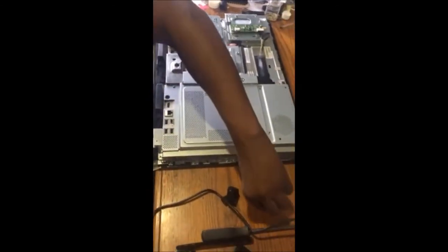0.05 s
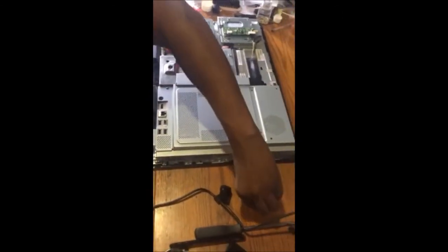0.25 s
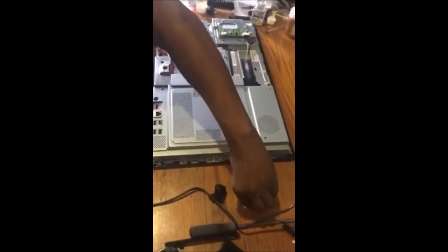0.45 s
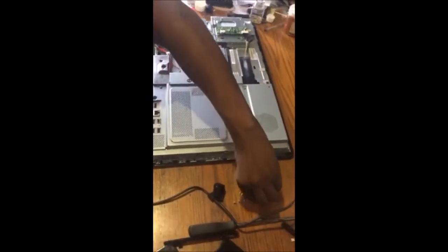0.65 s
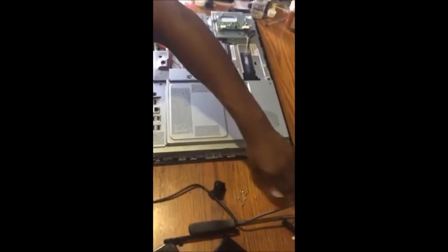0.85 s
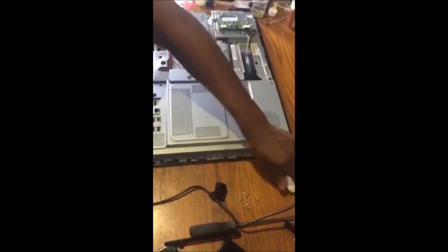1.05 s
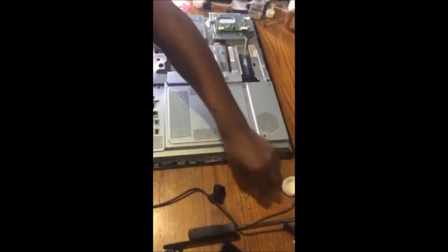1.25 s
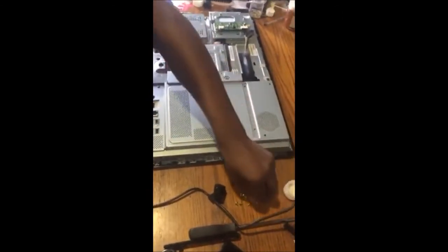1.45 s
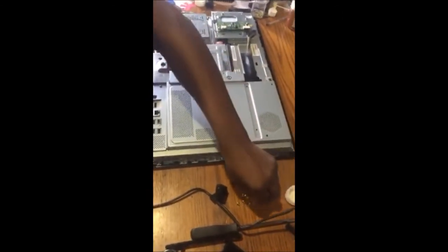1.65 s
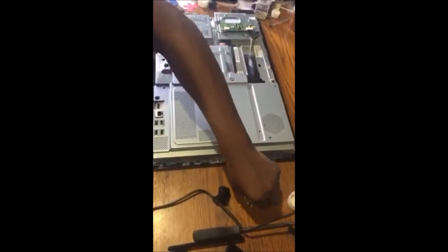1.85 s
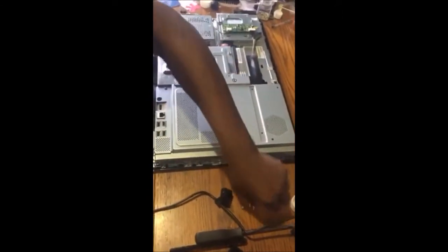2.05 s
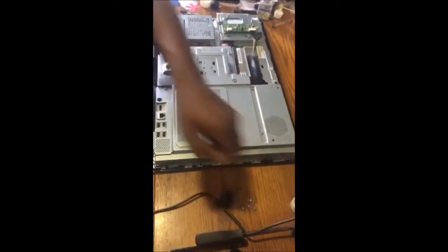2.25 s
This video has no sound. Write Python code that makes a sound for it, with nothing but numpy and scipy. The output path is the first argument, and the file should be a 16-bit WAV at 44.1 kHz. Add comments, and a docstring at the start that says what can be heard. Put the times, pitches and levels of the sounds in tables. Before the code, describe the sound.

A small hard part clatters on a wooden table from about 0.2 seconds, bouncing until it settles at 0.8. A soft bump follows at 0.9. Just after 1 second a plastic cap is set down with a dull clack, then wobbles on its rim from 1.2, growing faster and brighter until it stops at about 2. Behind are faint room hiss, low hum and barely audible distant bird chirps.

```python
"""A wooden table in a small room. A small hard part drops, bounces and chatters to rest.
After a soft bump a plastic cap is set down and wobbles on its rim, faster and faster, until flat.
Each contact is a force pulse that rings the object's modes and the dense response of the wood.
Behind: air noise, a low hum and faint chirps of a distant bird."""
import sys
import numpy as np
from scipy import signal
from scipy.fft import rfft, irfft
from scipy.io import wavfile
from scipy.ndimage import uniform_filter1d

SR = 44100
rng = np.random.default_rng(int(sys.argv[2]) if len(sys.argv) > 2 else 0)


def materialize(psi):
    """Save the field psi as 16-bit PCM at rate SR to the path in sys.argv[1].

    A 1-D psi becomes a single channel; in a 2-D psi each row is a channel.
    """
    bounded = np.clip(np.atleast_2d(psi).T, -1, 1)
    quanta = np.round(bounded * 32767).astype(np.int16)
    wavfile.write(sys.argv[1], SR, quanta)


N = 101429

# modes of the cap on the table: pitch_hz, level_db, t60_s
CAP_MODES = [(1000, -12, .055), (1200, -10, .11), (1351, -15, .12), (1806, -11, .12), (2197, -8, .09),
             (2335, -6, .075), (2470, -10, .06), (2830, -9, .1), (3340, -14, .1), (4500, -15, .04)]


def amp(db):
    """Decibels to gain."""
    return 10 ** (np.asarray(db) / 20)


def unit(x):
    """Scale to unit energy."""
    return x / np.sqrt(np.sum(x ** 2) + 1e-20)


def at_hz(points, hz):
    """Interpolate a table over log frequency."""
    knots_hz, values = np.transpose(points)
    return np.interp(np.log(hz + 1), np.log(knots_hz + 1), values)


def envelope(curve):
    """Gain along a level curve, zero outside it."""
    time_s, level_db = np.transpose(curve)
    return amp(np.interp(np.arange(N) / SR, time_s, level_db, left=-np.inf, right=-np.inf))


def add(mix, start_s, sound):
    """Mix in place, cropped to fit."""
    start = round(start_s * SR)
    sound = sound[max(-start, 0):]
    span = mix[max(start, 0):][:len(sound)]
    span += sound[:len(span)]


def min_phase(db_at, size):
    """Quickest pulse with a given spectrum."""
    log_gain = np.log(amp(db_at(abs(np.fft.fftfreq(size, 1 / SR)))))
    spectrum = np.exp(np.conj(signal.hilbert(log_gain)))
    return np.fft.ifft(spectrum).real[:size // 2]


def contact(tilt_db_oct, corner_hz=3260):
    """Force pulse of one contact: harder means more treble."""
    return min_phase(lambda hz: tilt_db_oct * np.log2(1 + (hz / corner_hz) ** 2) / 2, size=256)


def impacts(rows):
    """Force of a series of single contacts."""
    force = np.zeros(N)
    for start_s, level_db, tilt_db_oct in rows:
        add(force, start_s, amp(level_db) * contact(tilt_db_oct))
    return force


def grains(size, rate_hz, spread_db):
    """Random tiny contacts, on average unit energy per 10 ms."""
    hits = rng.random(size) < rate_hz / SR
    sign = rng.choice([-1, 1], size)
    strength = amp(spread_db * np.clip(rng.standard_normal(size), -2, 2))
    return unit(hits * sign * strength) * np.sqrt(size / SR * 100)


def dense_ring(t, t60_s):
    """Countless close modes dying together, with a flattened spectrum."""
    ring = rng.standard_normal(len(t))
    decay = amp(-60 * t / t60_s)
    undo_decay = amp(60 * np.minimum(t, t60_s) / t60_s) * np.sqrt(t60_s * SR / 13.8)
    for _ in range(3):
        spectrum = rfft(ring * decay)
        flat = irfft(spectrum / np.sqrt(uniform_filter1d(abs(spectrum) ** 2, size=20)), len(t))
        ring = np.where(t < t60_s / 2, unit(flat) * undo_decay, ring)
    return unit(ring * decay)


def body(modes, wood, modes_db, t60_s, treble_t60_s, rise_s, vary_db, crossover_hz=5000):
    """Response to one contact: dense wood ring, shorter in the treble, plus a few strong modes."""
    t = np.arange(SR // 4) / SR
    treble_share = 1 / (1 + (crossover_hz / (np.fft.rfftfreq(len(t), 1 / SR) + 1)) ** 6)
    low = rfft(dense_ring(t, t60_s)) * np.sqrt(1 - treble_share)
    high = rfft(dense_ring(t, treble_t60_s)) * np.sqrt(treble_share)
    rise = 1 - np.exp(-t / rise_s)
    ring = rise * irfft(low + high, len(t)) * (t < t[-1] / 2)
    colour = min_phase(lambda hz: at_hz(wood, hz), size=4096)
    dense = unit(signal.fftconvolve(ring, colour)[:len(t)])
    tones = np.zeros(len(t))
    for k, (pitch_hz, level_db, mode_t60_s) in enumerate(modes):
        pitch_hz += 1.5 * rng.uniform(-0.91, 1) / mode_t60_s  # contact point shifts damped modes most
        mode = (-1) ** k * rise * amp(-60 * t / mode_t60_s) * np.sin(2 * np.pi * pitch_hz * t)
        tones += amp(level_db + vary_db * rng.uniform(-1, 1)) * unit(mode)
    return dense + amp(modes_db) * tones


def turning(force, responses, turns_per_s):
    """As an object turns, the force passes between contact points, each with its own response."""
    out, count = np.zeros(N), len(responses)
    position = np.arange(N) / SR * turns_per_s * count
    for k, response in enumerate(responses):
        share = np.sin(np.pi / 2 * np.minimum((position - k) % count, 2)) ** 2
        out += signal.fftconvolve(share * force, response)[:N]
    return out


def small_part(settle_s=0.812, ring_hz=4340, ring_decay_s=0.014):
    """A hard part tumbles, bounces and chatters, then rings faintly as it settles."""
    # single hits: start_s, level_db, tilt_db_oct
    bounces = [(.2105, -12.5, -0.5), (.2365, -12, 1), (.243, 0, 2), (.2523, 1, -36), (.2625, -9, -12),
               (.2657, -0.5, -1), (.2822, -6, 1.5), (.306, -11.5, 6.5), (.3165, -6.5, 4.5), (.3205, -1, -4),
               (.3315, -4, -1.5), (.341, -3.5, 0.5), (.369, -6.5, 5), (.3773, -3.5, -0.5),
               (.3795, -5.5, 1.5), (.4058, -9.5, -1), (.4248, -5.5, 1.5), (.4615, -14, 2.5),
               (.4775, -19.5, 5), (.4925, -16, -5), (.4995, -13.5, 3), (.5305, -2.5, 1), (.58, -4, 2),
               (.6225, -3.5, 3), (.6335, -6.5, -2), (.6587, -9, 0.5), (.6655, -9, 0.5), (.6942, -6.5, 3),
               (.7282, -7, 3.5), (.754, -15, 6), (.791, -13, 0.5)]
    # fine chatter between hits: time_s, level_db
    chatter_curve = [(.17, -36.5), (.235, -26), (.255, -12), (.30, -19.5), (.335, -7.5), (.357, -17),
                     (.385, -10.5), (.46, -10.5), (.52, -17), (.57, -32), (.64, -23.5), (.78, -15),
                     (.825, -24.5), (.86, -51)]
    # modes of the part on the table: pitch_hz, level_db, t60_s
    modes = [(980, -12, .06), (1070, -15, .08), (1410, -16, .15), (1721, -14, .12), (1951, -9, .08),
             (2220, -5, .035), (2318, -6, .065), (2545, -13, .12), (2855, -11, .09), (3332, -13, .12),
             (3673, -13, .15), (6150, -8, .03)]
    # wood spectrum under the part: freq_hz, level_db
    wood = [(80, -19), (230, -12), (350, -5), (480, -16), (750, -1), (1300, -9), (2300, 5.5), (2900, 0),
            (4800, -1.5), (6200, 0), (8000, -5.5), (11000, -12.5), (15000, -15)]
    chatter = envelope(chatter_curve) * grains(N, rate_hz=700, spread_db=6.5)
    force = impacts(bounces) + np.convolve(chatter, contact(tilt_db_oct=1.5))[:N]
    responses = [body(modes, wood, modes_db=-4.5, t60_s=0.06, treble_t60_s=0.038,
                      rise_s=0.000081, vary_db=3.5) for _ in range(7)]
    out = amp(-8) * turning(force, responses, turns_per_s=5.18)
    t = np.arange(SR // 10) / SR
    add(out, settle_s, amp(-52) * np.exp(-t / ring_decay_s) * np.sin(2 * np.pi * ring_hz * t))
    return out


def cap_wobble(grain_rate_hz=2500, swing_fall_s=0.009):
    """The rim knocks and rolls over the wood grain in ever closer swings."""
    # rim knocks: start_s, level_db, tilt_db_oct
    knocks = [(1.241, 2, -2), (1.273, -2.5, -4), (1.344, -0.5, 0), (1.3535, -0.5, 1.5), (1.442, -7.5, 9),
              (1.4495, -3.5, 0.5), (1.514, -12.5, 3), (1.526, -5, -2), (1.598, -6.5, -5), (1.605, -2, -4),
              (1.679, -1, 1), (1.686, -5, 0), (1.745, -5, 1), (1.754, -2, 2), (1.8135, -3.5, 3.5),
              (1.821, -2.5, 2), (1.873, 0.5, -8.5), (1.88, -2.5, 6), (1.925, -1.5, 8), (1.969, -1.5, -17),
              (2.003, -2, 4.5)]
    # rolling swells: peak_s, rise_s, level_db
    swings = [(1.229, 0.0076, -10), (1.254, 0.006, 2), (1.357, 0.023, -4.5), (1.449, 0.022, -3.5),
              (1.538, 0.026, -4.5), (1.614, 0.021, -5), (1.691, 0.01, -3), (1.76, 0.011, -7),
              (1.885, 0.016, -4), (1.933, 0.0083, -3.5), (1.977, 0.016, -4.5)]
    # swings brighten as the cap sinks: time_s, tilt_db_oct
    swing_tilt = [(1.7, -2), (1.9, 6)]
    # slow rolling between swings: time_s, level_db
    creep_curve = [(1.06, -5.5), (1.2, -31), (1.3, -23), (1.6, -17), (1.9, -14.5), (2.025, -16),
                   (2.045, -47)]
    # wood spectrum under the cap: freq_hz, level_db
    wood = [(80, -22), (220, -14), (340, -1), (550, -9), (850, -2), (1550, -1.5), (2300, 7), (3200, -2.5),
            (4400, -5.5), (5200, -15), (6400, -15), (7600, -25.5), (15000, -47)]
    creep = envelope(creep_curve) * grains(N, grain_rate_hz, spread_db=1)
    force = impacts(knocks) + np.convolve(creep, contact(tilt_db_oct=-19.5))[:N]
    t = np.arange(-SR // 20, SR // 10) / SR
    for peak_s, rise_s, level_db in swings:
        pulse = contact(np.interp(peak_s, *np.transpose(swing_tilt)))
        swell = np.where(t < 0, np.exp(-(t / rise_s) ** 2), np.exp(-abs(t) / swing_fall_s))
        roll = swell * grains(len(t), grain_rate_hz, spread_db=1)
        add(force, peak_s + t[0], amp(level_db) * np.convolve(roll, pulse))
    responses = [body(CAP_MODES, wood, modes_db=-5, t60_s=0.041, treble_t60_s=0.028,
                      rise_s=0.0014, vary_db=5) for _ in range(6)]
    return amp(-13) * turning(force, responses, turns_per_s=2.3)


def rim_snaps(band_hz=(5400, 6900)):
    """The rim's hard edge snaps brightly on the wood."""
    # edge hits: start_s, level_db
    snaps = [(1.744, -26), (1.8123, -22)]
    out, t = np.zeros(N), np.arange(SR // 10) / SR
    band = signal.butter(5, band_hz, "bandpass", fs=SR, output="sos")
    for start_s, level_db in snaps:
        add(out, start_s, amp(level_db) * unit(signal.sosfilt(band, dense_ring(t, t60_s=0.03))))
    return out


def cap_landing(start_s=1.0558):
    """The cap is set down with one dull clack."""
    # wood spectrum of the clack: freq_hz, level_db
    wood = [(150, -17), (600, -13), (1200, 0), (1700, -6.5), (2400, 4.5), (3000, -14), (4300, -21),
            (5300, -44), (11600, -35), (14000, -47)]
    out = np.zeros(N)
    clack = body(CAP_MODES, wood, modes_db=-10, t60_s=0.03, treble_t60_s=0.02, rise_s=0.003, vary_db=0)
    add(out, start_s, amp(-7) * clack)
    return out


def table_bumps(sag_depth=2.87, sag_s=0.0021, rise_s=0.0017):
    """Soft pushes on the table, a few cycles each, whose pitch sags at once."""
    # pushes: start_s, level_db, final_pitch_hz, decay_s
    bumps = [(0.579, -44.5, 225, 0.013), (0.9352, -24.5, 113.4, 0.0033), (1.779, -54.5, 85, 0.03)]
    out, t = np.zeros(N), np.arange(SR // 10) / SR
    for start_s, level_db, pitch_hz, decay_s in bumps:
        cycles = np.cumsum(pitch_hz * (1 + sag_depth * np.exp(-t / sag_s))) / SR
        shape = (1 - np.exp(-t / rise_s)) * np.exp(-t / decay_s)
        add(out, start_s, amp(level_db) * shape * np.sin(2 * np.pi * cycles))
    return out


def finger_scuff(peak_s=1.176, half_width_s=0.022, centre_hz=1000):
    """Skin rubs plastic as the fingers let go: noise an octave wide."""
    band_hz = [centre_hz / np.sqrt(2), centre_hz * np.sqrt(2)]
    band = signal.butter(2, band_hz, "bandpass", fs=SR, output="sos")
    rub = unit(signal.sosfilt(band, rng.standard_normal(N))) * np.sqrt(N)
    swell = np.exp(-((np.arange(N) / SR - peak_s) / half_width_s) ** 2)
    return amp(-58) * swell * rub


def bird():
    """Distant wavering peeps, most arching up and down in pitch."""
    # peeps: middle_s, length_s, top_hz, level_db, arch_fraction
    chirps = [(.003, .032, 5000, -56, .2), (.085, .024, 4000, -57, .17), (1.53, .022, 5400, -51, .17),
              (1.913, .024, 5350, -52, .17), (2.166, .046, 1690, -62, 0), (2.303, .036, 4700, -51, .22)]
    out = np.zeros(N)
    wavers = 0.16 * uniform_filter1d(rng.standard_normal((len(chirps), SR // 10)), size=24)
    for (middle_s, length_s, top_hz, level_db, arch), waver in zip(chirps, wavers):
        arc = np.linspace(-np.pi / 2, np.pi / 2, int(length_s * SR))
        pitch_hz = top_hz * (1 + waver[:len(arc)] - arch * np.sin(arc) ** 2)
        tone = np.sin(2 * np.pi * np.cumsum(pitch_hz) / SR)
        add(out, middle_s - length_s / 2, amp(level_db) * np.cos(arc) * tone)
    return out


def reverb(x, build_s=0.0048):
    """Short diffuse room tail; treble dies first."""
    # room decay: freq_hz, t60_s
    decay_times = [(300, 0.86), (1000, 0.18), (2500, 0.27), (6000, 0.18), (14000, 0.069)]
    hz, t, noise = signal.stft(rng.standard_normal(SR // 2), SR, nperseg=256)
    fade = amp(-60 * t / at_hz(decay_times, hz)[:, None])
    build = 1 - np.exp(-(t / build_s) ** 2)
    tail = signal.istft(noise * fade * build, SR)[1]
    return signal.fftconvolve(x, unit(tail))[:N]


def room_tone(air_rms_db=-65.5):
    """Steady air noise and a low hum."""
    # air noise spectrum: freq_hz, relative_db
    air_spectrum = [(25, -29), (36, -10), (50, 0.5), (80, -3.5), (350, -5), (560, -13), (1900, -14),
                    (3500, -20.5), (15000, -31)]
    # hum tones: pitch_hz, rms_db
    hum_tones = [(51, -72.5), (168, -74)]
    colour = amp(at_hz(air_spectrum, np.fft.rfftfreq(N, 1 / SR)))
    air = unit(irfft(rfft(rng.standard_normal(N)) * colour, N)) * np.sqrt(N)
    t = np.arange(N) / SR
    hum = sum(amp(db) * np.sqrt(2) * np.sin(2 * np.pi * (hz * t + rng.random())) for hz, db in hum_tones)
    return amp(air_rms_db) * air + hum


def scene():
    """Mono mix of table, bird and room."""
    part = small_part()
    cap = cap_wobble() + rim_snaps() + cap_landing() + finger_scuff()
    peeps = bird()
    wet = reverb(amp(-12.5) * part + amp(-14.5) * cap + amp(-8) * peeps)
    return (part + cap + table_bumps() + peeps + wet + room_tone())[None]


def record(dry, cutoff_hz=15700):
    """Steep low-pass band limit."""
    lowpass = signal.firwin(255, cutoff_hz, window=("kaiser", 9), fs=SR)
    return signal.oaconvolve(dry, lowpass[None], "same")


dry = scene()
out = record(dry)
materialize(out)
```